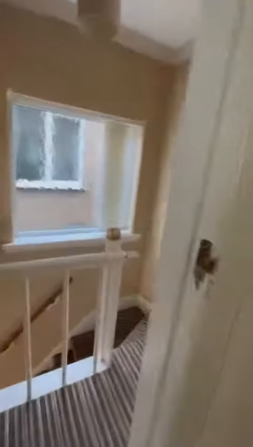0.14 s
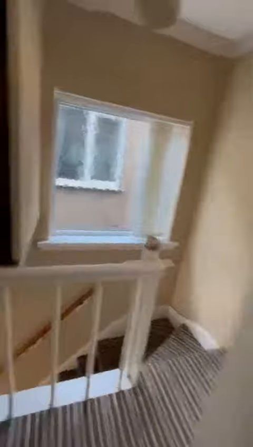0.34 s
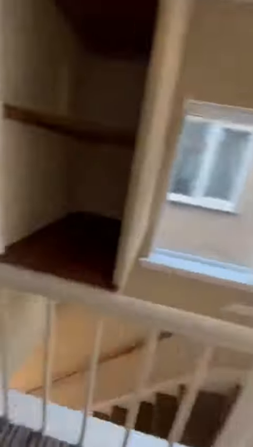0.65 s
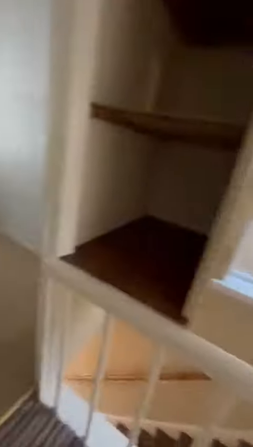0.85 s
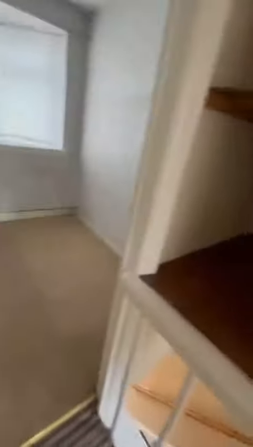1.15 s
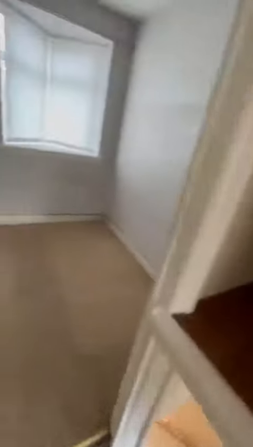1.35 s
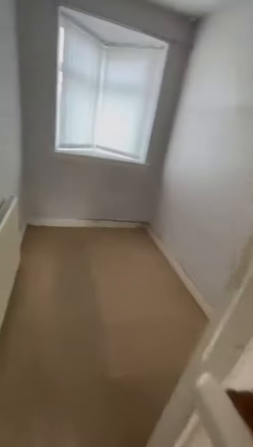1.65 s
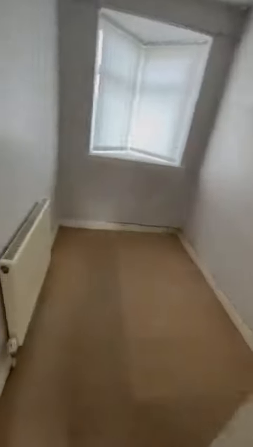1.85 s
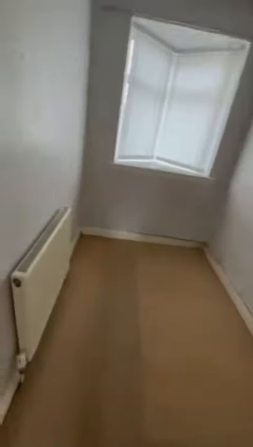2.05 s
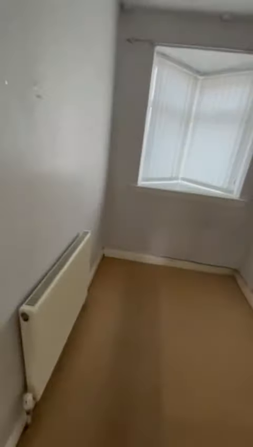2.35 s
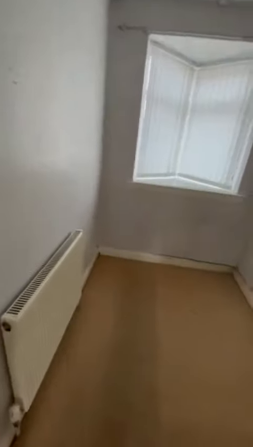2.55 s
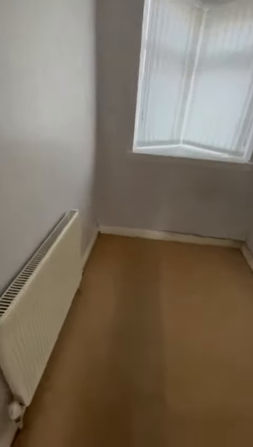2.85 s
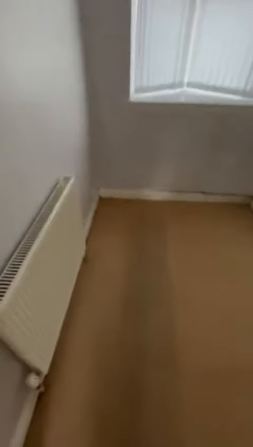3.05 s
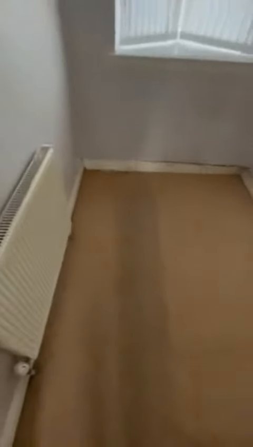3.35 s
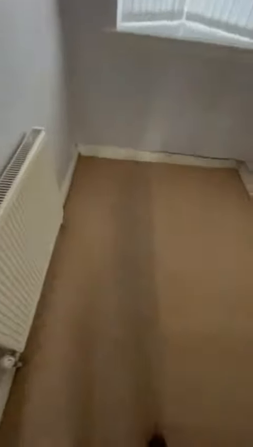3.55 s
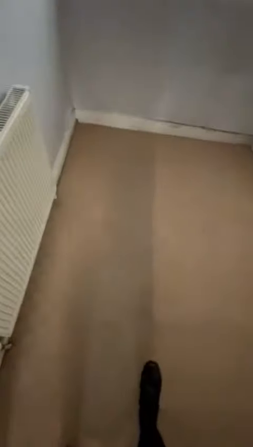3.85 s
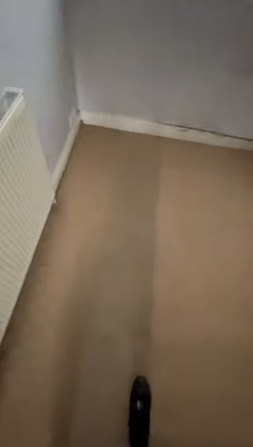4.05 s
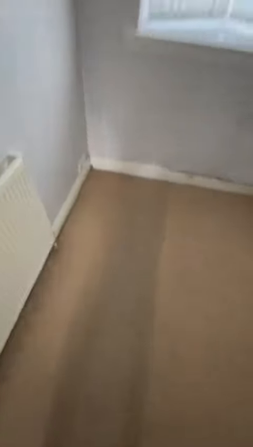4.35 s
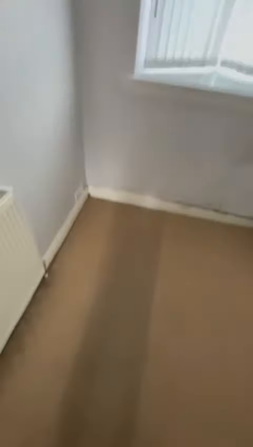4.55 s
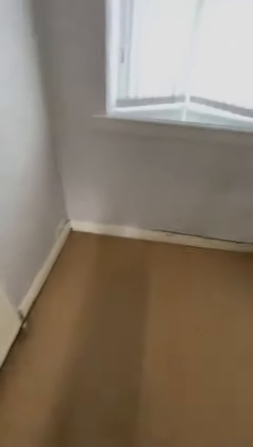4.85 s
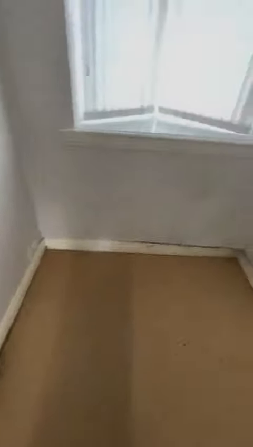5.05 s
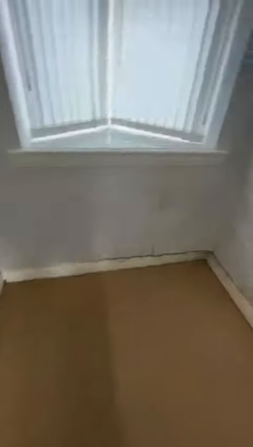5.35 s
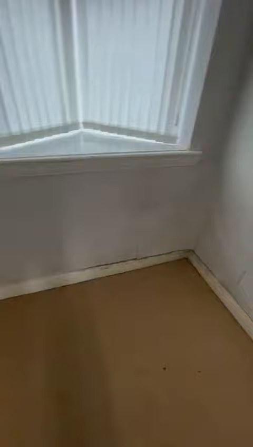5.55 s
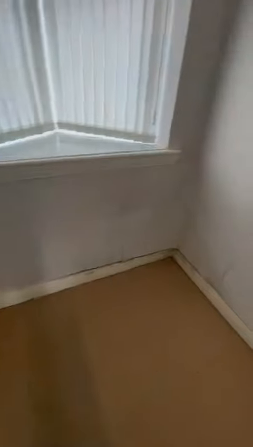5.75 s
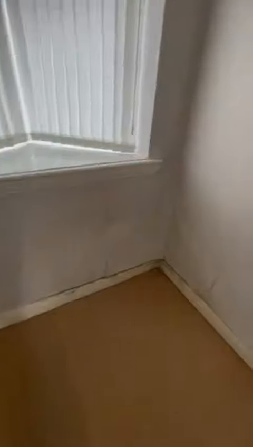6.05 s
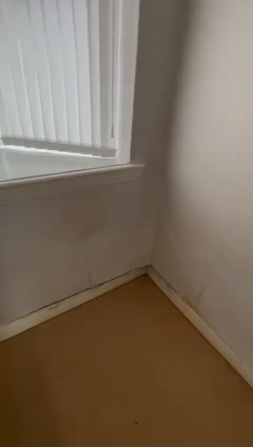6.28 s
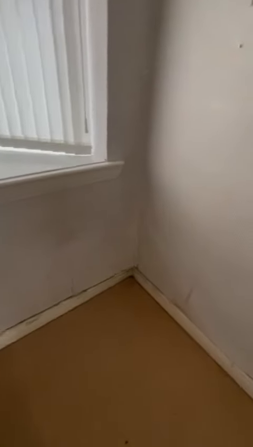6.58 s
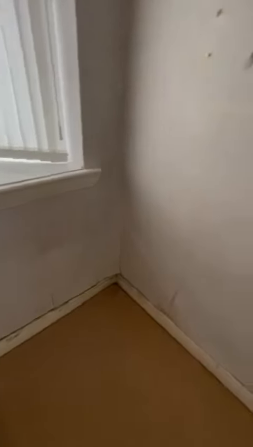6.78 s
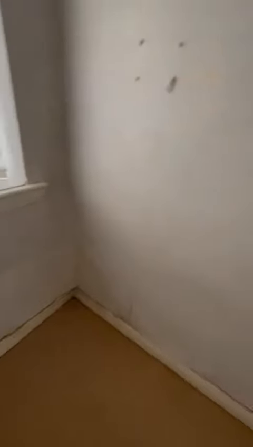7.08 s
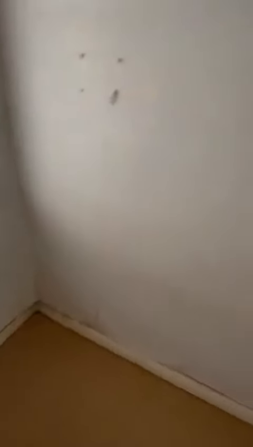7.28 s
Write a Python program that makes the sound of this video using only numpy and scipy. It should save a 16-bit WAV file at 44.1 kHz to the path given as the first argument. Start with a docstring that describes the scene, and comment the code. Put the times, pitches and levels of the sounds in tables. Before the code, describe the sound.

Keys jingle and soft steps cross carpeted boards in a bare room as a vehicle fades outside; two loose boards knock sharply.

```python
"""Outside, tyre roar and a wavering two-note engine drone fade out over some five seconds, over still house air.
From the start someone with a bunch of keys walks from the landing into a small empty bedroom: noise bursts
and damped modes clink, cloth rustles, and soles thud, tick and scuff on carpeted floorboards.
Near three and six and a half seconds two loose boards crack, knock the joist and ring as decaying sines.
Close sounds carry the bare room's echoes; two microphone ports take it in stereo, with the top cut."""
import sys
import numpy as np
from scipy import signal
from scipy.fft import rfft, irfft, next_fast_len
from scipy.io import wavfile
from scipy.ndimage import uniform_filter1d

SR = 44100
rng = np.random.default_rng(int(sys.argv[2]) if len(sys.argv) > 2 else 0)


def put_to_file(sound):
    """Save the sound as 16-bit audio at rate SR, in the file named by the first command-line argument."""
    columns = np.atleast_2d(sound).T  # one column per channel
    safe = np.clip(columns, -1, 1)
    whole_steps = np.round(safe * 32767)
    wavfile.write(sys.argv[1], SR, whole_steps.astype(np.int16))


N = 327222
TIME = np.arange(N) / SR
AGE = np.arange(SR // 2) / SR  # s, half a second counted from the start of one short sound

# Levels are before the trims in scene(); colours are spectral densities, of which only the shape counts.

# Tyre roar of the vehicle outside: [t/s, level/dB]
TYRE_LEVEL = [(0, -55.5), (1.2, -53.5), (1.4, -53.5), (1.68, -61.5), (2.4, -58), (2.95, -66.5),
              (3.34, -65.5), (4.4, -74), (4.6, -94)]
# Tyre noise as it comes through the window: [f/Hz, density/dB]
TYRE_COLOUR = [(40, 0), (70, 7.5), (150, 1), (300, 4.5), (500, 1), (750, 1.5), (1100, 2.5), (1600, -7),
               (2300, -8), (3500, -18), (6000, -21), (12000, -41)]
# The engine slows as it goes: [t/s, f/Hz]
ENGINE_PITCH = [(0, 65.4), (.6, 64.4), (1.0, 61.65), (1.8, 61.9), (2.2, 59.87), (2.9, 60.6), (3.5, 53.36),
                (4.6, 52.97)]
# Engine fundamental: [t/s, level/dB]
DRONE_LEVEL = [(0.0, -57), (0.45, -62), (0.61, -54), (0.72, -67), (0.82, -51.5), (1.38, -63), (1.47, -48.5),
               (2.29, -49.5), (2.36, -54), (3.2, -66), (4.25, -59.5), (4.59, -75), (4.6, -64)]
# Octave above it, booming for a second: [t/s, level/dB]
OCTAVE_LEVEL = [(0, -65), (1.0, -66), (1.25, -59), (2.18, -63), (2.3, -44), (2.43, -57.5), (2.52, -46),
                (2.92, -52), (3.5, -65), (4.6, -76)]

# Still air of the house: [f/Hz, density/dB]
STILL_COLOUR = [(20, -4), (32, -8), (48, 7.5), (65, 5), (90, -5), (135, -6), (260, -7), (450, -19),
                (1000, -19.5), (2000, -28), (5000, -33.5), (8000, -40.5), (12000, -42.5)]
STILL_DB = -64.5

# Cloth brushing as a leg or arm swings: [middle t/s, level/dB, half length/s]
SWINGS = [(.06, -63.5, 0.086), (.55, -56, 0.035), (.75, -59, 0.092), (1.1, -59.5, 0.081),
          (1.41, -54.5, 0.045), (1.51, -53.5, 0.06), (2.05, -70, 0.095), (2.5, -70.5, 0.29),
          (2.9, -59, 0.04), (3.33, -70, 0.29), (3.92, -67.5, 0.18), (4.32, -73.5, 0.094),
          (4.845, -64, 0.052), (5.04, -68.5, 0.07), (5.3, -70, 0.03), (5.43, -67, 0.06), (5.82, -71, 0.08),
          (6.05, -66, 0.17), (6.49, -68, 0.08), (6.98, -57.5, 0.048), (7.2, -67.5, 0.025),
          (7.38, -72, 0.058)]
# Rubbing fabric: [f/Hz, density/dB]
RUSTLE_COLOUR = [(100, 0), (400, -5), (900, 3.5), (1500, -3.5), (2400, 3), (3800, 3), (5700, 3),
                 (8000, -13), (10500, -10.5), (12500, -30)]
POCKET_DB, POCKET_S = -28, 0.03  # cloth rubbed by each clear clink: level against the clink, half length

# Clearest clinks of the keys: [t/s, peak level/dB, top octave's share/dB, time constant of sliding together/s]
CLEAR_CLINKS = [(0.044, -42, -3, 0.0094), (.297, -53.5, 7, .008), (.355, -51.5, -4, 0.025),
                (.442, -42, -7, 0.005), (0.535, -45, -6, .005), (.647, -49.5, -6, 0.0057),
                (.75, -40.5, 3, 0.021), (.798, -47, 15, 0.012), (0.968, -46, 10, 0.0026),
                (1.066, -47, 2, 0.0038), (1.089, -42, 2, 0.0089), (1.215, -50, -10, 0.017),
                (1.303, -42.5, 15, 0.0078), (1.361, -36, -6, 0.001), (1.3974, -35.5, -1, 0.0055),
                (1.4813, -44, 6, 0.0077), (1.641, -35.5, 16, 0.0036), (1.730, -33, 23, 0.0013),
                (1.7544, -37.5, 13, 0.0041), (1.9855, -45.5, 3, 0.0025), (2.0854, -52.5, -14, .01),
                (2.166, -46.5, 3, 0.0081), (2.4738, -52, -17, 0.015), (2.7142, -53.5, 1, .001),
                (2.756, -57.5, -12, .002), (3.3263, -50.5, -9, .004), (3.585, -60.5, 1, 0.017),
                (3.905, -62.5, -9, .005), (4.084, -63.5, -16, .003), (5.011, -50.5, -3, 0.0034),
                (5.442, -54, 6, .004), (5.8, -51.5, -10, 0.00088), (6.014, -58.5, -1, 0.017),
                (6.118, -60, -1, 0.0045), (6.658, -53.5, -14, 0.011), (6.768, -58, -10, 0.0098),
                (7.174, -54, 0, .001)]
# Modes of the keys: [f/Hz, level/dB, longest t60/s]
KEY_MODES = [(2333, -9, 0.086), (3230, -14.5, 0.082), (3460, -4, 0.047), (4070, -6.5, 0.05),
             (4834, -6, 0.13), (5450, 0, 0.041), (5550, -4, 0.059), (5920, -2.5, 0.031), (6420, 3, 0.095),
             (7440, -10, .14), (7900, -2.5, 0.08), (8270, -6, 0.068), (9146, -4, 0.12), (9600, -10, 0.059),
             (10330, -7.5, 0.12), (10640, -8.5, 0.062), (11150, -5.5, 0.11), (11200, -5.5, 0.12),
             (11290, -7, 0.079)]
# Bright splash of ring and chain: [f/Hz, density/dB]
JINGLE_COLOUR = [(1500, -56), (3000, 0.5), (4200, -1), (5700, 12), (8000, -5), (10500, -6), (12000, -8)]
# Spells of faint jostling: [start t/s, end t/s, clink peak level/dB]
JOSTLES = [(0.299, 1.7, -50), (1.797, 2.6, -59), (5.691, 6.25, -61.5), (6.699, 6.95, -61.5)]
JOSTLE_GAP_S = 0.1  # mean gap between faint clinks
FAINT_TOP_DB, TOP_SPREAD_DB = -14, 14  # their top octave's share and its spread
GATHER_S, RATTLE_S = 0.0091, 0.016  # time constants: sliding before a faint clink, rattle after any clink
LEAD_S = 0.05  # sliding heard ahead of the moment the keys meet

# Key chain slithering link over link: [t/s, level/dB, rise/s, fall/s]
SLITHERS = [(.436, -51, .005, .02), (0.741, -54, .008, .025), (1.368, -54, .006, .035),
            (1.738, -49.5, .006, .025), (3.323, -60, .002, 0.015), (3.897, -63, .006, .028),
            (5.8, -58.5, 0.0068, 0.026), (7.173, -59, .001, .026)]
# Fine hiss of the links: [f/Hz, density/dB]
CHAIN_COLOUR = [(1500, -22), (2400, -5), (4200, -3), (5900, -1), (7500, 0), (9000, -12), (10500, -2),
                (11500, -3), (12500, -15)]

# Heels and soles landing on carpet: [t/s, level/dB, f/Hz, rise/s, fall/s]
STEPS = [(0.513, -36, 137, 0.0039, .01), (0.564, -38, 136, 0.0053, 0.013), (0.625, -48, 165, 0.0089, 0.075),
         (0.662, -46, 610, 0.0023, 0.018), (1.608, -46, 372, 0.0062, 0.01),
         (2.794, -40.5, 280, 0.0021, 0.014), (2.836, -47, 241.3, 0.0048, 0.02),
         (2.848, -48.5, 525, 0.0033, 0.012), (2.877, -44, 840, 0.0014, 0.022),
         (4.022, -52, 600, 0.009, 0.012), (4.265, -50, 760, 0.0016, 0.038), (4.92, -54, 168, .01, .04),
         (5.383, -54, 670, 0.013, 0.015), (5.607, -61, 727, 0.001, 0.0064),
         (6.145, -60, 342, 0.0024, 0.075), (6.953, -54.5, 420, 0.00055, .008),
         (7.044, -56, 440, 0.0048, 0.038), (7.05, -61, 850, 0.0051, 0.027), (7.228, -65, 1170, .005, 0.028)]
# A footfall's spectrum around its pitch: [multiple of the pitch, density/dB]
STEP_COLOUR = [(.12, -15), (.5, -6), (.85, -0.5), (1, 1.5), (1.2, -5), (1.6, -10), (3, -19.5), (8, -37),
               (30, -67)]
# Dry ticks and clacks from shoes, clothes and key fob: [t/s, peak level/dB, f/Hz, fall/s]
TICKS = [(1.360, -36, 5700, 0.0097), (1.730, -40, 2300, 0.01), (1.834, -53, 4160, .003),
         (2.715, -45.5, 7100, .004), (2.878, -46.5, 2580, 0.007), (3.687, -57.5, 5000, 0.0022),
         (3.773, -57, 4940, 0.0034), (3.831, -54.5, 5600, 0.0012), (3.896, -56, 5200, .002),
         (5.016, -55, 3400, .006), (5.2993, -46.5, 5760, 0.0013), (5.310, -53, 5900, .0012),
         (5.7174, -55, 8200, 0.003), (5.769, -62, 5000, .002), (6.068, -57, 8400, .005),
         (6.196, -59, 8340, .002), (6.952, -52, 2630, 0.0015)]
# A tick's spectrum around its pitch: [multiple of the pitch, density/dB]
TICK_COLOUR = [(.05, -20), (.25, -19), (.7, -8.5), (1, 12), (1.3, -4), (2.2, -15.5), (5, -38)]

# Weight rolling onto a foot, the floor rumbling: [middle t/s, level/dB, half length/s]
WEIGHT_SHIFTS = [(1.95, -55.5, .25), (2.7, -56.5, 0.24), (3.6, -62.5, 0.53), (4.08, -64.5, 0.28),
                 (4.47, -65, 0.16), (4.97, -57, 0.18), (5.41, -57.5, 0.078), (5.97, -64.5, 0.069),
                 (6.24, -66.5, 0.14), (6.8, -66, 0.16), (7.1, -64.5, 0.081)]
# The flexing floor: [f/Hz, density/dB]
WEIGHT_COLOUR = [(30, -16), (55, 3), (85, -5), (140, 3.5), (250, -5.5), (450, -10.5), (900, -27),
                 (2500, -49)]

# Soles dragging over the pile: [t/s, level/dB, rise/s, fall/s, brightness as a factor on frequency]
SCUFFS = [(2.872, -57.5, .008, 0.034, 1.16), (3.955, -59, 0.035, .04, 1.25), (4.24, -63, .02, .04, 1),
          (4.812, -51.5, .045, .026, 1.07), (4.968, -56, 0.018, .028, 1.05), (5.074, -59, .02, .018, 0.83),
          (5.258, -62.5, .025, .03, 1.05), (5.372, -57.5, 0.014, 0.018, 1.04),
          (5.925, -59.5, .035, 0.021, 0.9), (6.14, -62, 0.0055, 0.12, 0.83),
          (6.944, -56, 0.016, 0.037, 1.33)]
# Rasp of a sole: [f/Hz, density/dB]
SCUFF_COLOUR = [(120, -11), (300, -2), (650, 5.5), (1100, -1), (1600, -3), (2500, -0.5), (4000, -5.5),
                (6000, -17.5), (8000, -43), (12000, -42)]
SCUFF_CATCHES_PER_S = 3200  # how often the sole catches and slips

# Boards ticking on one note under the foot: [t/s, peak level/dB, f/Hz]
BOARD_TICKS = [(2.878, -42.5, 843), (4.267, -47, 830), (4.85, -54.5, 542), (7.043, -51.5, 435),
               (7.046, -57, 807), (7.058, -57, 956), (7.068, -52.5, 353)]
# Loose boards crack free, then ring: [crack t/s, crack level/dB, rise/s, fall/s, ring t/s, ring level/dB]
KNOCKS = [(3.1193, -30.5, .001, 0.0039, 3.131, -37), (6.536, -36.5, 0.0018, 0.0082, 6.5445, -23.5)]
# The wood's crack: [f/Hz, density/dB]
CRACK_COLOUR = [(200, -2), (900, 2), (2300, 5), (3600, -2.5), (5300, -0.5), (7500, -12.5), (10000, -17),
                (12000, -42)]
# Per board, blows on the joist:
# [t/s, clatter level/dB, clatter fall/s, thump level/dB, thump f/Hz, thump swell/s]
JOIST_BLOWS = [
    [(3.1255, -32, 0.0057, -27, 234, 0.0026), (3.1332, -32, .009, -17.5, 640, 0.00089)],
    [(6.5415, -33, 0.004, -25.5, 358, 0.0041), (6.5472, -31.5, 0.0037, -27, 1020, 0.0018)],
]
# Per board, its dull clatter: [f/Hz, density/dB]
CLATTER_COLOURS = [
    [(60, -28), (130, -12), (200, -1.5), (300, -8), (460, -4), (570, 1), (900, 7), (1100, -8), (1300, 2),
     (1700, -18), (2400, -7.5), (5000, -12.5), (8000, -41), (12000, -50)],
    [(60, -31), (140, -14.5), (190, -10), (270, -9.5), (400, 5), (620, -2), (820, -6), (1020, 0),
     (1500, -12), (2100, -8), (2900, -10), (3700, -21), (5400, -19), (7500, -26), (12000, -33)],
]
# Per board, its modes: [f/Hz, level/dB, t60/s]
BOARD_MODES = [
    [(189.5, -7, 0.4), (247, -4, 0.14), (418, -10, 0.55), (582, 2, 0.26), (734, -10, 0.32), (825, -5, 0.3),
     (874, -8, 0.45), (904, 1, 0.18), (1295, -13, 0.27), (1357, -8, .17), (1556, -13, .15),
     (2010, -15, 0.2), (2170, -11, .12), (2490, -18, .17)],
    [(248, -20, 0.36), (281, -17, .3), (351.8, -2.5, 0.34), (382, -5, 0.37), (420, -4.5, 0.29),
     (471, -7, 0.27), (574, -19.5, 0.2), (627, -15, 0.34), (1018, -5, 0.19), (1070, -23, 0.34),
     (1330, -22, 0.2), (1688, -24, .12), (2030, -23, .14), (2320, -24, 0.15), (2630, -21, .15),
     (2830, -16, 0.11)],
]
# Per board, the nearest walls throwing each blow back: [delay/s, level/dB]
WALL_SLAPS = [
    [(.0153, -17), (.031, -19)],
    [(.0197, -13), (.0598, -21)],
]

# Decay of the bare room: [f/Hz, t60/s]
ROOM_T60 = [(100, 0.6), (350, 0.48), (1000, 0.34), (3000, 0.26), (6000, 0.3), (12000, 0.25)]
# Likeness of the two microphone ports, opposite in phase near 4 and 8 kHz: [f/Hz, correlation]
PORT_LIKENESS = [(60, 0.89), (150, 0.89), (350, 0.72), (700, 0.049), (1150, 0.26), (2500, 0.6),
                 (4100, -0.55), (5400, -0.0018), (6600, -0.63), (8200, -0.86), (9300, -0.52), (10200, 1)]
# Left port minus right: [f/Hz, level/dB]
BALANCE_LR = [(60, -0.2), (180, 1.5), (400, 3.5), (1200, 2), (2500, 1.8), (5000, 0.5), (12000, -1)]
CUTOFF_HZ = 11750


def amp(db):
    """Decibels to gain."""
    return 10 ** (np.asarray(db) / 20)


def unit(x):
    """Scale to rms 1."""
    return x / np.sqrt(np.mean(x ** 2) + 1e-20)


def unit_peak(x):
    """Scale each channel so that its loudest hundredth of a second has rms 1."""
    power = uniform_filter1d(x ** 2, size=441, mode="constant")
    return x / np.sqrt(power.max(axis=1, keepdims=True) + 1e-20)


def in_time(rows):
    """Value of a curve at every sample."""
    s, value = np.transpose(rows)
    return np.interp(TIME, s, value)


def at_hz(points, hz):
    """Read a table on a log-frequency axis."""
    f, value = np.transpose(points)
    return np.interp(np.log(hz + 0.00098), np.log(f), value)


def shaped(x, gain):
    """Filter by a gain that is a function of frequency."""
    size = next_fast_len(x.shape[-1])
    hz = np.arange(size // 2 + 1) * SR / size
    return irfft(rfft(x, size) * gain(hz), size)[..., :x.shape[-1]]


def noise(colour, size=N, scale=1, grit_db=0):
    """Two unrelated coloured noises (mid and side), rms 1; grit makes single grains stand out."""
    grains = amp(grit_db * np.minimum(rng.standard_normal(size), 3))
    white = rng.standard_normal((2, size)) * grains
    return unit(shaped(white, lambda hz: amp(at_hz(colour, hz / scale))))


def drift(rate_hz):
    """Slow random wander with rms 1."""
    return unit(shaped(rng.standard_normal(N), lambda hz: 1 / (1 + (hz / rate_hz) ** 2)))


def burst(colour, rise, fall, scale=1):
    """Gritty noise that swells and decays, like a blow on many dense, quickly damped modes."""
    swell = (1 - np.exp(-AGE / max(rise, 1e-4))) ** 2
    decay = np.exp(-AGE / max(fall, 5e-4))
    return unit_peak(noise(colour, size=len(AGE), scale=scale, grit_db=5.5) * swell * decay)


def swells(rows):
    """Smooth rises and falls of gain, one for each row of (middle s, dB, half length s)."""
    power = sum(amp(db) ** 2 * np.exp(-((TIME - s) / half) ** 2 * 2) for s, db, half in rows)
    return np.sqrt(power + 1e-20)


def add(out, s, sound):
    """Mix a sound in at time s."""
    start = int(min(round(s * SR), N - 1))
    sound, start = sound[:, max(-start, 0):], max(start, 0)
    out[:, start:start + sound.shape[1]] += sound[:, :N - start]


def off_walls(x, wall_gain, path_s, count=3):
    """Reflections with slowly drifting path lengths lay shifting ripples on a sound."""
    out = x
    for k in range(count):
        delay = path_s * (1 + 0.7 * k) + 0.000507 * drift(0.31)
        reflection = np.array([np.interp(TIME - delay, TIME, channel) for channel in x])
        out = out + wall_gain * reflection
    return unit(out)


def vehicle(tyre_db, drone_db, octave_db, waver_db, uneven_db, fade_db_per_s):
    """Tyre roar as coloured noise and two wavering engine orders as sines, dying away down the street."""
    hz = in_time(ENGINE_PITCH) * (1 + 0.0201 * drift(4.94))
    phase = 2 * np.pi * np.cumsum(hz) / SR
    first_gain = amp(in_time(DRONE_LEVEL) + drone_db + waver_db * drift(6.7))
    octave_gain = amp(in_time(OCTAVE_LEVEL) + octave_db + waver_db * drift(23))
    drone = first_gain * np.sin(phase)
    drone += octave_gain * np.sin(2 * phase + 0.68 * drift(18.0))
    tyre_gain = amp(in_time(TYRE_LEVEL) + tyre_db + uneven_db * drift(12))
    tyres = tyre_gain * off_walls(noise(TYRE_COLOUR), wall_gain=0.32, path_s=0.0045)
    gone = amp(-fade_db_per_s * np.maximum(TIME - TYRE_LEVEL[-1][0], 0))
    return gone * (tyres + drone * [[1], [0]])  # drone in the mid only


def still_air():
    """The house's steady background, as coloured noise."""
    return amp(STILL_DB) * noise(STILL_COLOUR)


def clothes(level_db, grain_db, rest_db, fold_db):
    """Fabric rubs unevenly with swings and clear clinks; shifting folds make it duller or brighter."""
    pocket = [(s + POCKET_S, db + POCKET_DB, POCKET_S) for s, db, *_ in CLEAR_CLINKS]
    rubbing = np.hypot(amp(level_db) * swells(list(SWINGS) + pocket), amp(rest_db))
    cloth = noise(RUSTLE_COLOUR, grit_db=6.5)
    dull = shaped(cloth, lambda hz: 1 / (1 + (hz / 3000) ** 4))
    bright = cloth - dull
    folded = unit(dull * amp(fold_db * drift(13)) + bright * amp(fold_db * drift(13)))
    catches = unit(amp(grain_db * drift(25.0)))
    return rubbing * catches * folded


def faint_clinks(count=40):
    """Uneven runs of light clinks while the keys jostle, in rows like CLEAR_CLINKS."""
    rows = []
    for start, end, db in JOSTLES:
        times = start + JOSTLE_GAP_S * (np.arange(count) + rng.random(count))
        tops = FAINT_TOP_DB + TOP_SPREAD_DB * rng.standard_normal(count)
        rows += [(s, db, top, GATHER_S) for s, top in zip(times, tops) if s < end]
    return rows


def ring(clicks, hz, t60):
    """A two-pole resonator: a unit click sets a decaying sine of starting height 1 ringing."""
    r, w = amp(-60 / (t60 * SR)), 2 * np.pi * hz / SR
    return signal.lfilter([0, np.sin(w)], [1, -2 * r * np.cos(w), r * r], clicks + 1e-18)


def keys(level_db, jingle_db, top_db, touches_per_s, jingle_fall_s, first_touch, variety_db):
    """Keys slide together, meet and rattle; other keys meet each time, so other modes stand out."""
    since = AGE - LEAD_S  # time from the moment they meet
    treble = signal.butter(1, 9000, "high", fs=SR, output="sos")
    out = np.zeros((2, N))
    for s, db, share_db, gather in list(CLEAR_CLINKS) + faint_clinks():
        pressure = np.exp(np.minimum(since / max(gather, 1e-4), -since / RATTLE_S))
        touches = (rng.random(len(AGE)) < touches_per_s / SR) * pressure
        touches[np.argmax(pressure)] = first_touch
        at, metal = np.flatnonzero(touches), 0
        for hz, mode_db, t60 in KEY_MODES:
            clicks = np.zeros((2, len(AGE)))
            clicks[:, at] = touches[at] * rng.standard_normal((2, len(at)))
            strength, grip, detune = rng.standard_normal(3)  # neighbours damp and detune a key
            mode = ring(clicks, hz * (1 + 0.0017 * detune), t60 * amp(-1.5 * abs(grip)))
            metal = metal + amp(mode_db + variety_db * strength) * mode
        # the many damped modes of ring and chain give a short bright splash at each touch
        splash_gain = signal.lfilter([1], [1, -np.exp(-1 / (jingle_fall_s * SR))], touches + 1e-18)
        splash = splash_gain * noise(JINGLE_COLOUR, size=len(AGE))
        clink = unit_peak(metal) + amp(jingle_db) * unit_peak(splash)
        top = signal.sosfilt(treble, clink)
        clink = clink + (amp(top_db + share_db) - 1) * top
        add(out, s - LEAD_S, amp(db + level_db) * unit_peak(clink))
    return out


def key_chain(level_db):
    """Many tiny links touching in quick succession, as gritty bursts of treble noise."""
    out = np.zeros((2, N))
    for s, db, rise, fall in SLITHERS:
        add(out, s, amp(db + level_db) * burst(CHAIN_COLOUR, rise, fall))
    return out


def footsteps(step_db, tick_db):
    """Heels thud low, soles land higher, and shoes, clothes and fob tick: pitched noise bursts."""
    out = np.zeros((2, N))
    for s, db, hz, rise, fall in STEPS:
        add(out, s, amp(db + step_db) * burst(STEP_COLOUR, rise, fall, scale=hz))
    for s, db, hz, fall in TICKS:
        add(out, s, amp(db + tick_db) * burst(TICK_COLOUR, 0.0003, fall, scale=hz))
    return out


def floor_rumble(level_db):
    """The floor flexes as the weight shifts, swelling low noise."""
    return amp(level_db) * swells(WEIGHT_SHIFTS) * noise(WEIGHT_COLOUR)


def scuffs(level_db, spread_db, smooth_share):
    """A dragging sole catches and slips in many tiny uneven jerks."""
    out = np.zeros((2, N))
    for s, db, rise, fall, brightness in SCUFFS:
        caught = rng.random(len(AGE)) < SCUFF_CATCHES_PER_S / SR
        catches = caught * amp(spread_db * np.minimum(rng.standard_normal(len(AGE)), 1.5))
        rub = (catches + smooth_share) * rng.standard_normal((2, len(AGE)))
        rasp = shaped(rub, lambda hz: amp(at_hz(SCUFF_COLOUR, hz / brightness)))
        stroke = (1 - np.exp(-AGE / rise)) ** 2 * np.exp(-AGE / fall)
        add(out, s, amp(db + level_db) * unit_peak(rasp * stroke))
    return out


def board_note(hz, t60):
    """One mode of a floorboard, swelling and dying away; mostly in the middle."""
    tone = amp(-60 * AGE / t60) * np.exp(2j * np.pi * hz * AGE)
    return np.array([tone.imag, 0.51 * tone.real]) * (1 - np.exp(-AGE / 0.0018))


def loose_boards(tick_t60):
    """Boards crack off the nail, hit the joist twice and ring; others tick. Returns (impacts, ringing)."""
    impacts, ringing = np.zeros((2, N)), np.zeros((2, N))
    boards = zip(KNOCKS, JOIST_BLOWS, CLATTER_COLOURS, BOARD_MODES, WALL_SLAPS)
    for knock, blows, colour, modes, slaps in boards:
        crack_s, crack_db, crack_rise, crack_fall, ring_s, ring_db = knock
        add(impacts, crack_s, amp(crack_db) * burst(CRACK_COLOUR, crack_rise, crack_fall))
        for s, clatter_db, fall, thump_db, hz, swell in blows:
            clatter = amp(clatter_db) * burst(colour, 0.00072, fall)
            thump_gain = amp(thump_db) * AGE / swell * np.exp(1 - AGE / swell)
            thump = thump_gain * np.sin(2 * np.pi * hz * AGE) * [[1], [0]]  # mid only
            add(impacts, s, clatter)
            add(ringing, s, thump)
            for delay, db in slaps:
                add(ringing, s + delay, amp(db) * (clatter + thump))
        notes = sum(amp(db) * board_note(hz, t60) for hz, db, t60 in modes)
        add(ringing, ring_s, amp(ring_db) * notes)
    for s, db, hz in BOARD_TICKS:
        add(ringing, s, amp(db) * board_note(hz, tick_t60))
    return impacts, ringing


def room_response(first_echo_s, clump_db):
    """Dense wall echoes that build up, come in uneven clumps and die away band by band; energy 1."""
    out, edges = 0, np.geomspace(60, 14000, 13)
    for low, high in zip(edges, edges[1:]):
        band_filter = signal.butter(2, [low, high], "band", fs=SR, output="sos")
        band = signal.sosfilt(band_filter, rng.standard_normal((2, len(AGE))))
        out = out + band * amp(-60 * AGE / at_hz(ROOM_T60, np.sqrt(low * high)))
    clumps = amp(clump_db * drift(76)[:len(AGE)])
    build_up = 1 - np.exp(-(AGE / first_echo_s) ** 2)
    return unit(out * clumps * build_up) / np.sqrt(len(AGE))


def microphone(pair):
    """Mid and side, weighted by the ports' likeness at each frequency, become left and right."""
    def likeness(hz):
        """Correlation of the ports, kept short of perfect."""
        return np.clip(at_hz(PORT_LIKENESS, hz), -0.98, 0.995)

    mid = shaped(pair[0], lambda hz: np.sqrt((1 + likeness(hz)) / 2))
    side = shaped(pair[1], lambda hz: np.sqrt((1 - likeness(hz)) / 2))
    left_right = np.array([mid + side, mid - side])
    return shaped(left_right, lambda hz: amp(at_hz(BALANCE_LR, hz) * [[1], [-1]] / 2))


def scene():
    """The walker's sounds with their room echoes, over street, house air and floor rumble."""
    street = vehicle(tyre_db=4.0, drone_db=4.0, octave_db=2.5, waver_db=1.5, uneven_db=0.84,
                     fade_db_per_s=9.5)
    body = clothes(level_db=1.0, grain_db=2.8, rest_db=-84.0, fold_db=3.0)
    clinks = keys(level_db=-6.5, jingle_db=-7.5, top_db=-0.5, touches_per_s=380, jingle_fall_s=0.0034,
                  first_touch=0.72, variety_db=4.5)
    clinks = clinks + key_chain(level_db=-1)
    body = body + footsteps(step_db=-1.5, tick_db=-7.5)
    body = body + scuffs(level_db=-2.5, spread_db=2.0, smooth_share=0.066)
    impacts, ringing = loose_boards(tick_t60=0.18)
    # how strongly each source excites the room
    sent = amp(-8.0) * body + amp(-9.5) * clinks + amp(-5.0) * impacts + amp(-17.0) * ringing
    room = room_response(first_echo_s=0.0057, clump_db=2.8)
    echoes = signal.fftconvolve(sent, room, axes=1)[:, :N]
    steady = street + still_air() + floor_rumble(level_db=-1.0)
    return microphone(body + clinks + impacts + ringing + echoes + steady)


def record(dry):
    """A steep low-pass cuts the top."""
    return signal.sosfilt(signal.ellip(12, 0.1, 90, CUTOFF_HZ, fs=SR, output="sos"), dry)


dry = scene()
out = record(dry)
put_to_file(out)
```